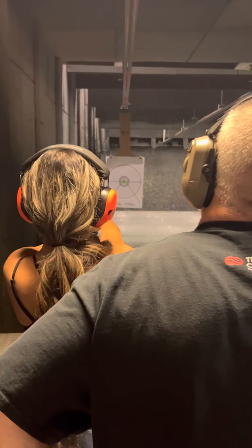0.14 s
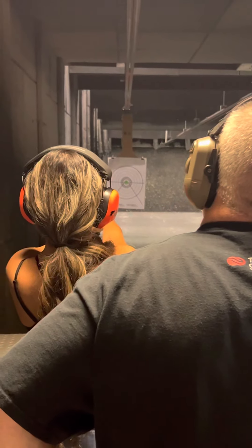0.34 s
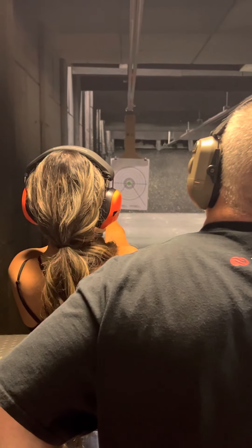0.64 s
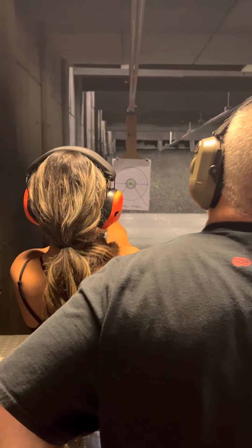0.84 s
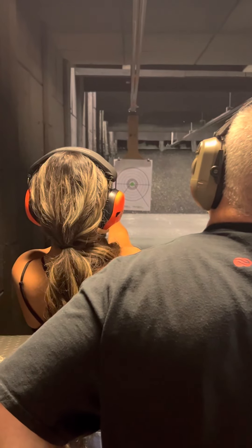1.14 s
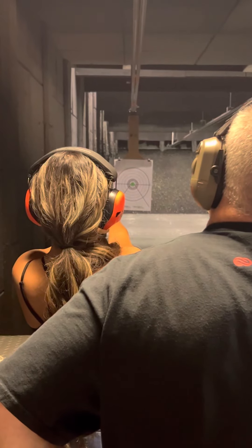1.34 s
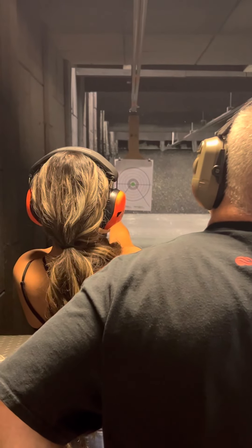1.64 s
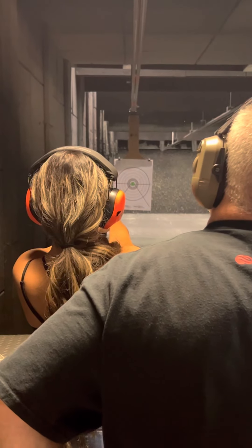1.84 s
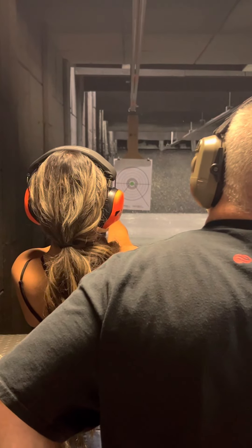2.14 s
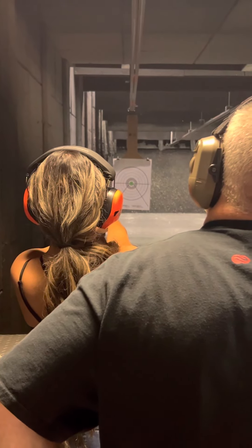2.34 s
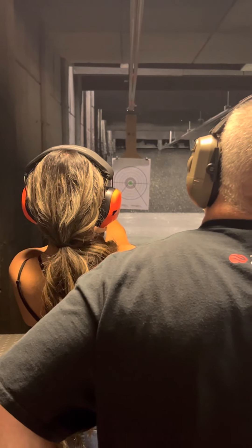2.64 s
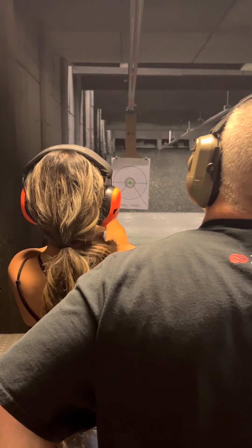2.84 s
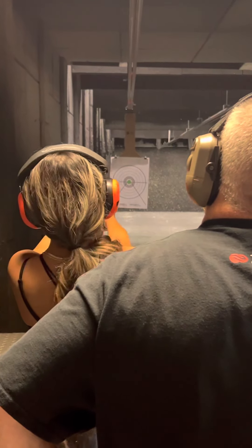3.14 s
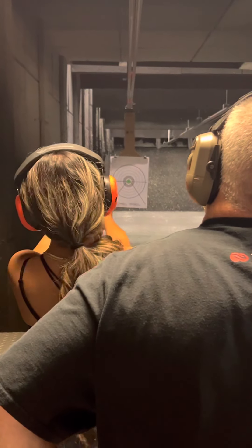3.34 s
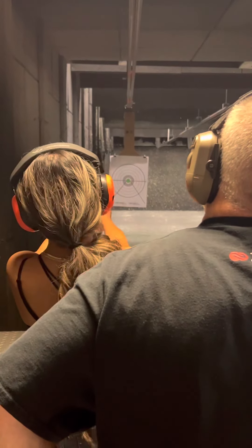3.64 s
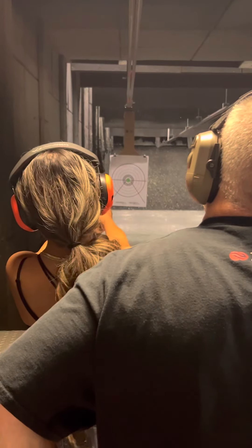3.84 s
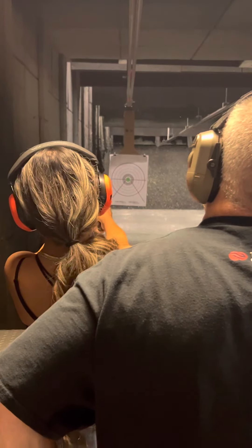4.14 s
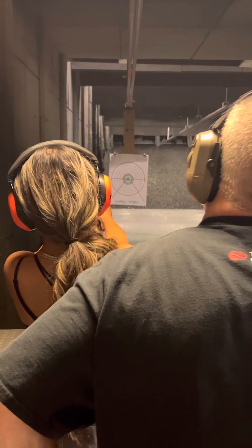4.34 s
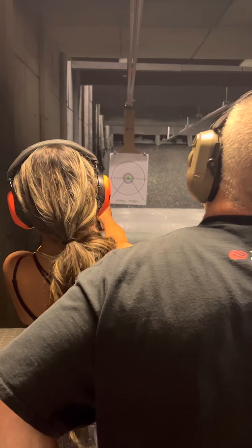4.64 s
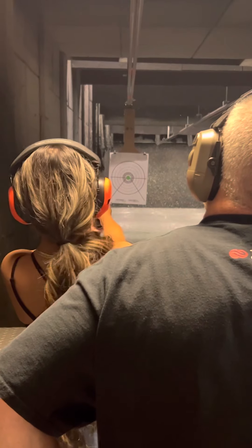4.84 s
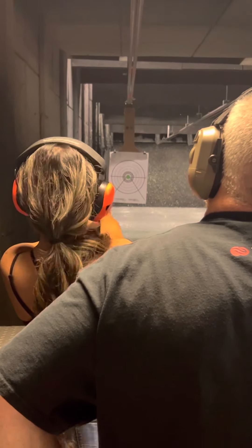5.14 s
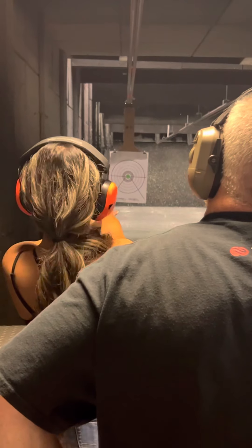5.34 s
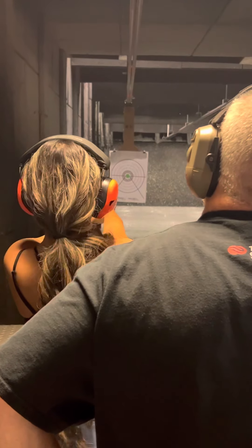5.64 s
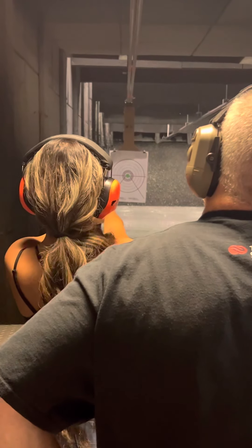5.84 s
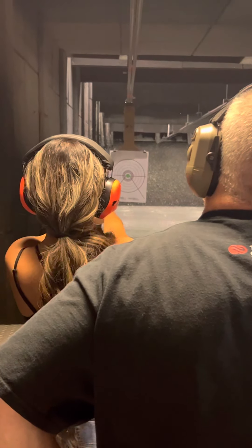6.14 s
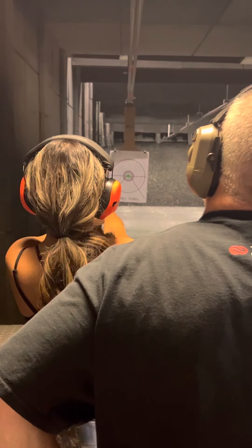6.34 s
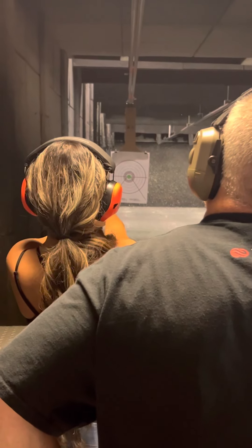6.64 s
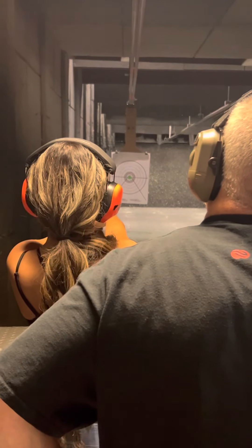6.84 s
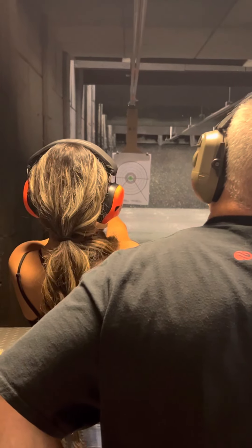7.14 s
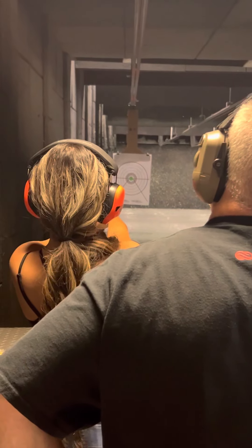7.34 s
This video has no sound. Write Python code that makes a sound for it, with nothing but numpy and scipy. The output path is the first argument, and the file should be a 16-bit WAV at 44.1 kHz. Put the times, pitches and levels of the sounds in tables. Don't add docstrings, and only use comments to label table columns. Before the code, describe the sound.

Low ventilation rumble and soft grille hiss in an indoor range, one dry bright metallic crack near two seconds, then faint ticks and handling bumps.

```python
import sys
import numpy as np
from scipy import signal
from scipy.fft import rfft, irfft, next_fast_len
from scipy.io import wavfile
from scipy.ndimage import uniform_filter1d

SR = 44100
rng = np.random.default_rng(int(sys.argv[2]) if len(sys.argv) > 2 else 0)


def dump(signal):
    limited = np.clip(np.atleast_2d(signal).T, -1, 1)
    pcm = np.round(limited * 32767).astype(np.int16)
    wavfile.write(sys.argv[1], SR, pcm)


def ratio_of_db(decibels):
    return 10 ** (np.asarray(decibels, float) / 20)


N = 330397


def on_log(table, hz, column=1):
    rows = np.array(table, float)
    return np.interp(np.log(hz + 1), np.log(rows[:, 0]), rows[:, column])


def shaped(x, table):
    size = x.shape[-1]
    gain = ratio_of_db(on_log(table, np.fft.rfftfreq(size, 1 / SR)))
    return irfft(rfft(x) * gain, size)


def level(x, db):
    return x * ratio_of_db(db) / np.sqrt(np.mean(x ** 2))


def walk(rate):
    hold = int(SR / rate)
    steps = np.repeat(rng.standard_normal(N // hold + 1), hold)
    return 1.1 * uniform_filter1d(uniform_filter1d(steps, hold), hold)[:N]


def bands(size, lo_hz, hi_hz, count=1):
    position = count * np.log2((np.fft.rfftfreq(size, 1 / SR) + 1) / lo_hz)
    centres = np.arange(np.ceil(count * np.log2(hi_hz / lo_hz)) + 1)
    away = np.clip(position, 0, centres[-1]) - centres[:, None]
    return lo_hz * 2 ** (centres / count), np.cos(np.clip(away, -1, 1) * np.pi / 2)


def hits():
    strikes = {"frame": [(2.2113, -34.5, -11, 10), (2.2148, -16.5, -2, 5.5)],
               "case": [(2.6854, -41.5, -2, 4.9)], "catch": [(4.2068, -43, -6.5, 4)],
               "pin": [(2.594, -67.5, -10, 2.5), (3.5695, -50, -9, 5), (3.675, -78, -16, 4)],
               "dull": [(3.0854, -62.5, -13, 4.9), (4.0851, -71, -20, 4), (4.3595, -77, -9, 2.5),
               (4.367, -64, -10, 3.5)]}
    resonances = {"frame": [(1140, 160, 10.5), (2193, 120, 4.5), (2585, 98, 11.5), (2993, 400, -13),
                  (3750, 220, 12.5), (4640, 100, 3.5), (4920, 150, 15), (5360, 170, 10.5), (5850, 210, 5.5),
                  (6730, 190, 6), (7884, 350, 8.5), (10450, 270, 6), (13700, 1400, -10),
                  (15200, 192, 19.5)], "case": [(2590, 160, 6), (3800, 1500, 0), (5200, 400, 6),
                  (6420, 140, 5), (7150, 120, 5), (7810, 250, 5), (9400, 140, 0), (10200, 200, 7),
                  (11300, 230, 2), (12750, 400, -12), (13620, 240, 13.5), (14400, 500, 6), (15400, 600, 7)],
                  "catch": [(2300, 900, 1), (4200, 1100, -9), (5380, 220, 12), (6570, 130, 5),
                  (7290, 490, 11), (9120, 200, 9), (10000, 290, 0), (11000, 350, 12), (12600, 250, 7),
                  (13450, 400, -18), (14200, 500, 6)], "pin": [(3560, 270, 8), (5180, 230, 5),
                  (6440, 330, 11), (7640, 160, 4), (8620, 160, 2), (10000, 230, 7), (11200, 200, 7),
                  (12600, 900, -5), (14800, 800, 9)], "dull": [(5800, 2300, 15.5), (5700, 500, 1),
                  (7500, 400, 2), (10300, 1500, 5)]}
    build = {"frame": (1.8, -1, 11599, .5, -5), "case": (0.2, -3, 12300, 1, 0),
             "catch": (4, -1.5, 12301, 0.83, -4), "pin": (-2.5, 0, 11798, 1, -6),
             "dull": (-3, 0, 10300, 1.5, -7)}
    slaps = {"frame": (16, 3), "case": (31, 6), "catch": (24, 4), "pin": (30, 4), "dull": (30, 2)}
    # (f/Hz, level/dB)
    crack = [(700, -35), (1000, -19), (2400, -8), (3100, -10.5), (4500, -8), (6300, -8), (9000, -4),
             (11500, -7.5), (12800, -7.5), (14200, -4), (15700, -10), (16300, -15.5), (16800, -51)]
    strike_db = 5
    lead = 32
    size = 2 ** 14
    t = np.arange(size) / SR
    ms = t * 1000
    hz = np.fft.rfftfreq(size, 1 / SR)
    fade = np.minimum(np.arange(size) / lead, 1) * (t < .35)
    out = np.zeros((2, 2, N + size))
    for s, db, top_db, rattle_ms, part in [(*row, p) for p in strikes for row in strikes[p]]:
        body_db, hall_db, top_hz, echo_ring, echo_top_db = build[part]
        decay = ratio_of_db(-.6 * ms + strike_db * np.exp(-t / .0012))
        shape = np.minimum(t / 0.00025, 1) * decay / (1 + (ms / max(rattle_ms, 1)) ** 4.0)
        uneven = ratio_of_db(3.3 * rng.standard_normal((2, size)))
        clicks = rfft(shape * rng.standard_normal((2, size)) * uneven)
        even = np.sqrt(uniform_filter1d(np.abs(clicks) ** 2, size=90))
        clicks = clicks / even * np.sqrt(np.sum(shape ** 2))
        ring = 1 + sum((ratio_of_db(g) - 1) / (1 + 2j * (hz - f) / w) for f, w, g in resonances[part])
        weight = [(3500, body_db), (5000, 0), (top_hz, 0), (1.2 * top_hz, top_db),
                  (15750, top_db), (16300, 1.76 * top_db)]
        tint = ratio_of_db(on_log(weight, hz) + on_log(crack, hz))
        echo_gain = ratio_of_db(3.0 + echo_top_db * np.clip((hz - top_hz) / 900 + 1, 0, 1))
        echoes = rfft(room(size, hall_db, *slaps[part])) * ring ** echo_ring * echo_gain
        sound = irfft(np.array([clicks * ring, echoes]) * tint, size)
        sound = np.roll(sound, lead, axis=2) / np.sqrt(np.mean(sound[:, 0, :256].sum(axis=0) ** 2))
        at = int(s * SR) - lead
        out[..., at:at + size] += ratio_of_db(db) * sound * fade
    return out[..., :N]


def room(size, hall_db, slap_ms, slap_db):
    # (f/Hz, t60/s)
    hall = [(1000, 0.281), (3000, 0.17), (5000, 0.24), (7500, 0.26), (11000, 0.23), (12700, .185),
            (15300, .22)]
    clump_db, slap_width_ms = 1.5, 2.4
    t = np.arange(size) / SR
    booth_tail = ratio_of_db(-1.5 - 60 * t / 0.047)
    out = 0
    for hz, window in zip(*bands(size, 960, 15300, count=3)):
        clumps = uniform_filter1d(np.repeat(rng.standard_normal(size // 256), 256), size=256)
        noise = rng.standard_normal((2, size)) * ratio_of_db(clump_db * clumps)
        hall_tail = ratio_of_db(hall_db - 12.0 - 60 * t / on_log(hall, hz))
        out = out + irfft(window * rfft(noise), size) * (booth_tail + hall_tail)
    slap = ratio_of_db(slap_db * np.exp(-((t * 1000 - slap_ms) / slap_width_ms) ** 2))
    build_up = 1 - np.exp(-(t / 0.0032) ** 2)
    return shaped(out * slap * build_up, [(15700, -0.5), (15950, -26.5)])


def hush(echoes, knee_db=-60, slope=0.22):
    loud_db = 10 * np.log10(uniform_filter1d(echoes[0] ** 2, size=441) + 1e-14)
    return echoes * ratio_of_db(slope * np.minimum(loud_db - knee_db, 0))


def faint_swell():
    # (f/Hz, level/dB)
    noise_peaks = [(5200, 2), (6250, -4), (7350, 3), (7950, -3)]
    from_s, to_s, rise_db_per_ms = 2.195, 2.2125, 1.3
    t = np.arange(N) / SR
    size = next_fast_len(N)
    hz = np.fft.rfftfreq(size, 1 / SR)
    narrow_bands = sum(ratio_of_db(g) * np.exp(-((hz - f) / 250) ** 2) for f, g in noise_peaks)
    band_noise = irfft(narrow_bands * rfft(rng.standard_normal((2, size))), size)[:, :N]
    rise_db = rise_db_per_ms * 1000 * np.minimum(t - to_s, 0)
    edges = np.clip(np.minimum(t - from_s, to_s - t) / .0015, 0, 1)
    return level(band_noise, -43.5) * ratio_of_db(rise_db) * edges


def grip():
    # (t/s, level/dB, f/Hz, length/cycles, side share/dB)
    bumps = [(0.38, -61.5, 380, .8, 23), (4.324, -31, 74, 0.96, -30), (4.335, -26.5, 234, 1.06, -26.5),
             (4.3403, -17.5, 108.5, 0.71, -27), (4.528, -31, 80, 1.4, -26), (4.588, -26, 105, 0.97, -26),
             (6.968, -27, 74, 4.7, -52), (7.137, -23.5, 92, 1.6, -25), (7.156, -24.5, 115, 1.65, -24),
             (7.205, -22.5, 79, 0.83, -43), (7.437, -39, 70, 1.5, -14)]
    t = np.arange(N) / SR
    out = np.zeros((2, N))
    for s, db, hz, cycles, side_db in bumps:
        swell = np.exp(-((t - s) * hz / cycles) ** 2 * 2)
        thump = ratio_of_db(db) * swell * np.sin(2 * np.pi * hz * (s - t))
        out += thump * ratio_of_db(np.array([[0], [side_db]]))
    return out


def air():
    # (f/Hz, level/dB)
    duct = [(12, -35), (23, -24), (31, -3), (43, -2), (55, 6), (63, 1.5), (73, 6.5), (110, -3.5), (151, -4),
            (183, -15), (219, -10), (275, -12), (330, -22), (700, -120)]
    # (f/Hz, level/dB)
    grille = [(190, -29.5), (330, -4), (357, -1), (413, -6), (586, -10.5), (635, -9), (699, -15), (820, -9),
              (1240, -9.5), (1550, -4.5), (2100, -15.5), (4250, -31), (5500, -39), (6100, -45),
              (9800, -53.5), (11300, -59), (13000, -64.5), (14200, -80)]
    duct_db, grille_db = -36.5, -49.5
    surge_db = surges()
    size = next_fast_len(N)
    flow = 0
    for hz, window in zip(*bands(size, 30.0, 15000)):
        noise = irfft(window * rfft(rng.standard_normal((2, size))), size)
        flicker_db = .5 * walk(1.4) + 0.73 * walk(9)
        sway_db = surge_db / (1 + (hz / 130) ** 4) + flicker_db
        flow = flow + noise * np.pad(ratio_of_db(sway_db), (0, size - N), mode="edge")
    rumble = level(shaped(flow, duct), duct_db)
    hiss = level(shaped(flow, grille), grille_db)
    return (rumble + hiss)[:, :N]


def surges():
    # (t/s, level/dB)
    drift = [(0, 0), (4.25, -1.3), (4.45, 4), (4.95, -1.4), (6.85, -0.2), (7.0, 0), (7.49, 0.4)]
    # (t/s, rise/dB)
    gust_times = [
        (.52, 1),
        (1.9, 1),
        (2.75, 2),
        (3.32, 3.5),
        (6.09, 4.5),
        (7.32, 4.5),
    ]
    gust_half_s, buffet_db, buffets_per_s = 0.049, -0.64, 13
    t = np.arange(N) / SR
    s, db = np.transpose(drift)
    gusts = sum(rise_db * np.exp(-((t - at) / gust_half_s) ** 2) for at, rise_db in gust_times)
    return np.interp(t, s, db - db.mean()) + gusts + buffet_db * walk(buffets_per_s)


def fans():
    # (f/Hz, level/dB, wobble/dB, wander/Hz)
    tones = [(33.4, -47.5, -1, 0.091), (54.8, -48.5, 1.5, 1.5)]
    hum = 0
    for hz, db, wobble_db, wander_hz in tones:
        loudness = np.sqrt(2) * ratio_of_db(db + wobble_db * walk(1.3))
        phase = 2 * np.pi * np.cumsum(hz + wander_hz * walk(.8)) / SR
        hum = hum + loudness * np.sin(phase)
    return hum


def ports(sound, least_db):
    # (f/Hz, side minus mid/dB, share tied to the mid/0-1, its phase/rad)
    spread = [(100, -59, 0.07, -9), (262, -25.5, 0, -1.5), (581.6, -7.5, 0.07, -4), (860, -10.5, 0.06, -5),
              (1107, -9.5, 0.1, -3), (1327, 0.5, .55, -2.5), (1601, -7.5, .7, -3), (2040, -23, .3, -5),
              (2344, -49, .05, 0), (4757, -38.5, 0.18, -0.5), (5490, -2.5, .9, -1.6),
              (7000, -2.5, 0.95, -1.55), (16000, -1, .9, -1.55)]
    edge = 2 ** 12
    size = next_fast_len(N + 2 * edge)
    hz = np.fft.rfftfreq(size, 1 / SR)
    mid, other = rfft(np.pad(sound, ((0, 0), (edge, edge)), mode="reflect"), size)
    tied = np.clip(on_log(spread, hz, column=2), 0, 1)
    turned = np.sqrt(tied) * np.exp(1j * on_log(spread, hz, column=3)) * mid
    side_gain = ratio_of_db(np.maximum(on_log(spread, hz), least_db))
    side = side_gain * (turned + np.sqrt(1 - tied) * other)
    return np.array([sound[0], irfft(side, size)[edge:edge + N]])


def scene():
    direct, echoes = hits()
    surround = air() + fans() + hush(echoes) + faint_swell()
    mid, side = ports(surround, -60) + ports(direct, -17) + grip()
    return np.array([mid + side, mid - side])


def top_cut(x):
    return signal.sosfilt(signal.butter(12, 16650, fs=SR, output="sos"), x)


def record(dry):
    fade_in = .45 + np.arange(N) / 64
    fade_out = np.arange(N)[::-1] / 256
    ends = np.sin(np.pi / 2 * np.minimum(np.minimum(fade_out, fade_in), 1)) ** 2
    return top_cut(dry * ends)


dry = scene()
out = record(dry)
dump(out)
```